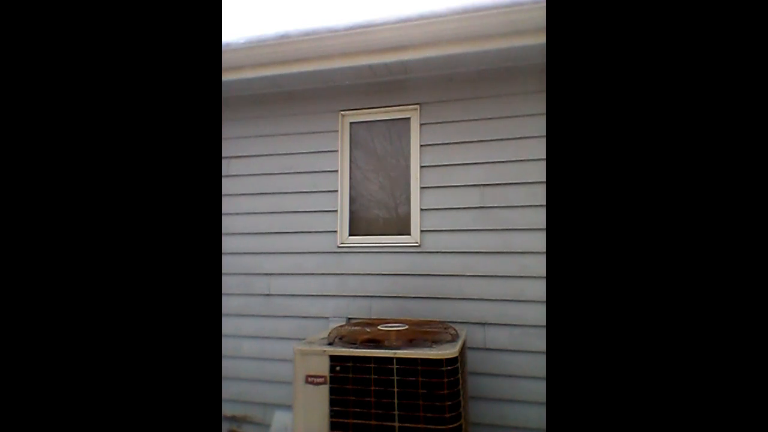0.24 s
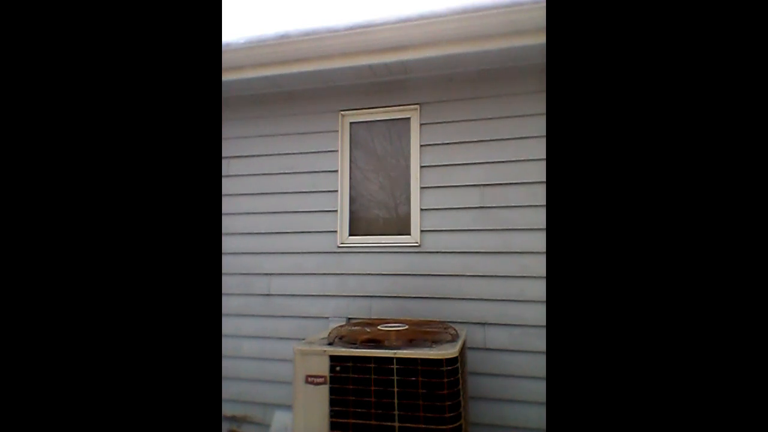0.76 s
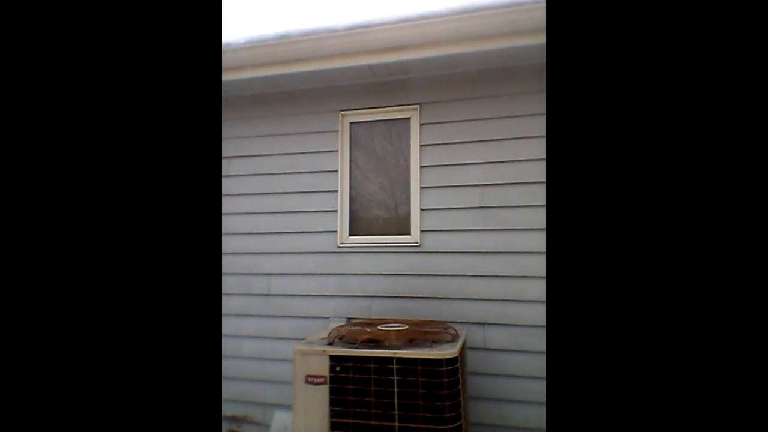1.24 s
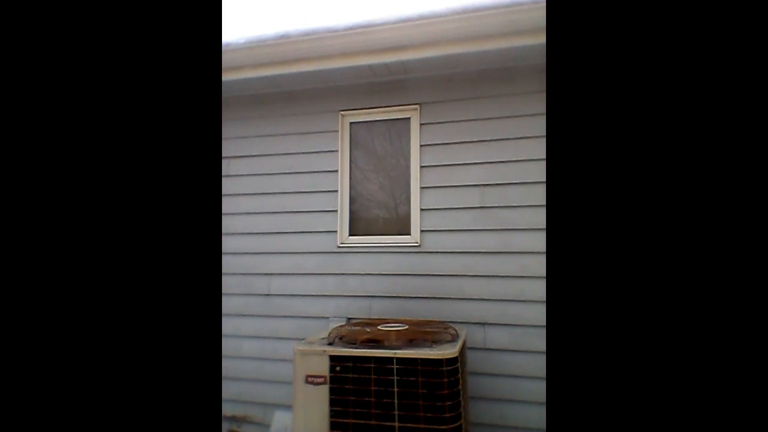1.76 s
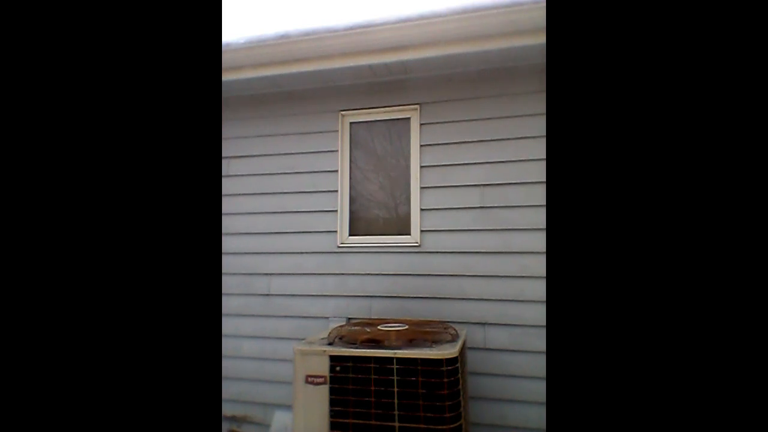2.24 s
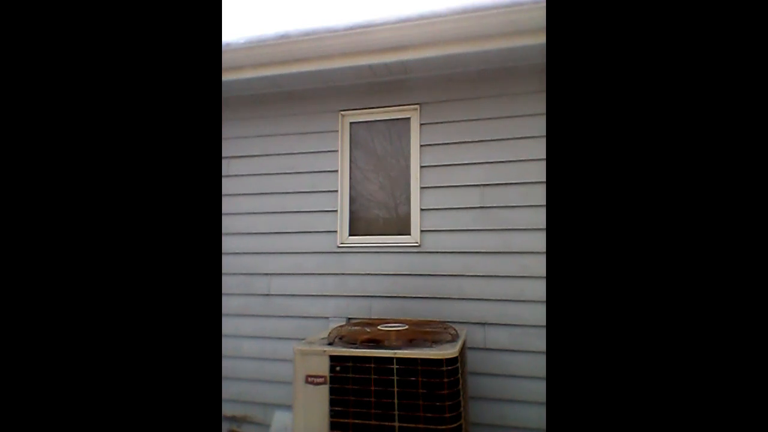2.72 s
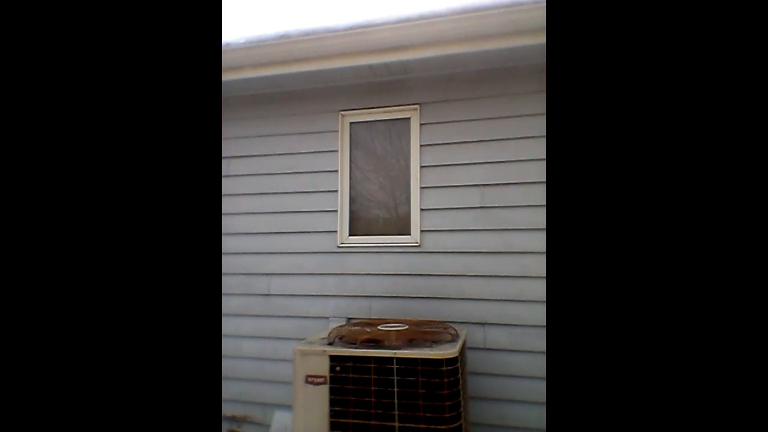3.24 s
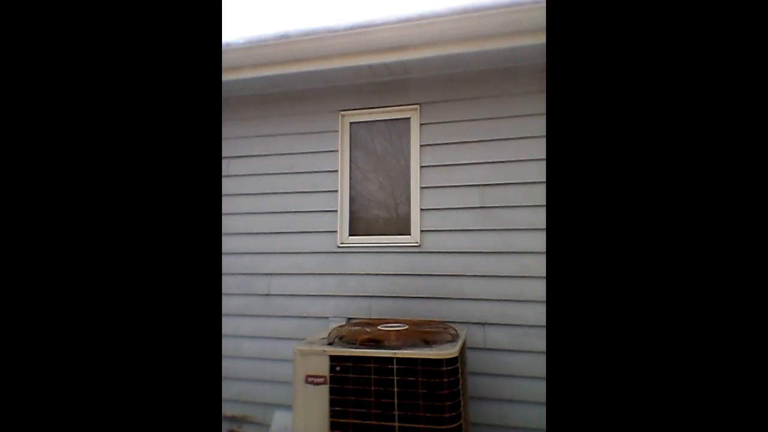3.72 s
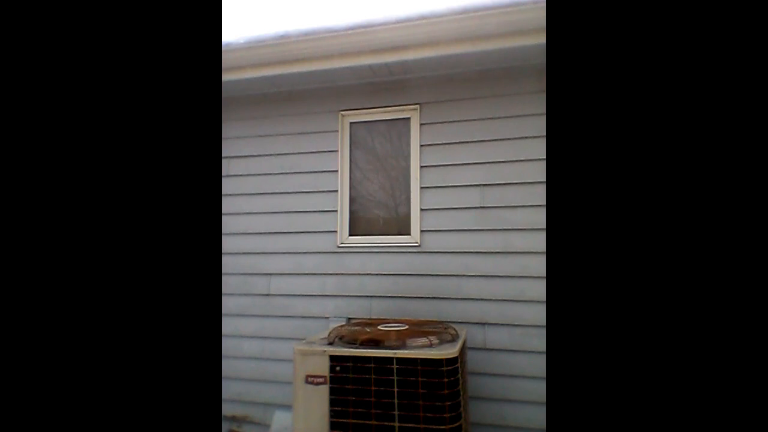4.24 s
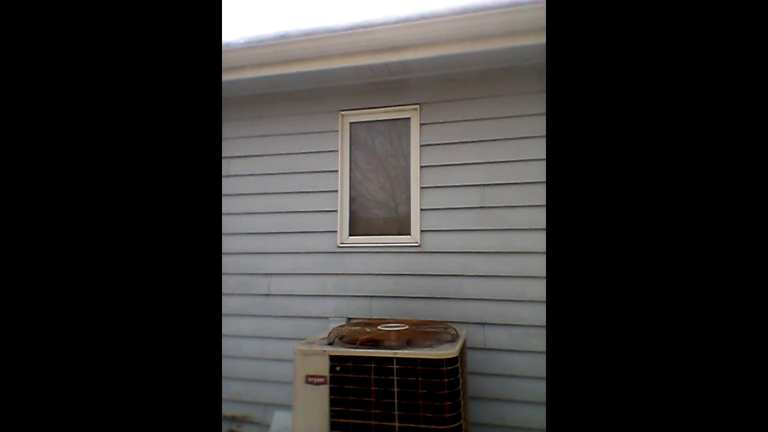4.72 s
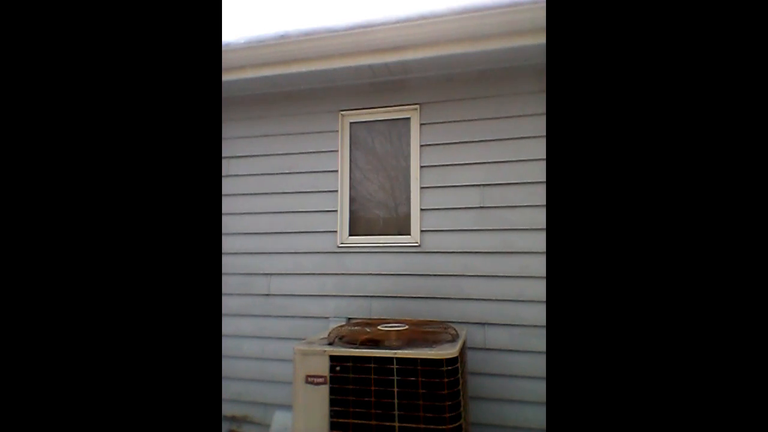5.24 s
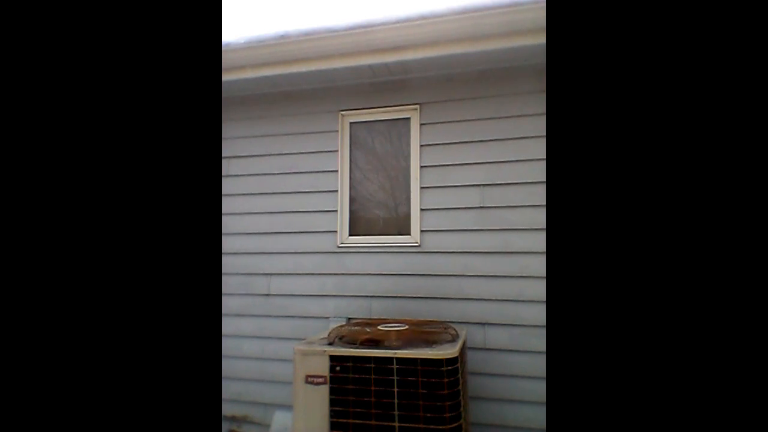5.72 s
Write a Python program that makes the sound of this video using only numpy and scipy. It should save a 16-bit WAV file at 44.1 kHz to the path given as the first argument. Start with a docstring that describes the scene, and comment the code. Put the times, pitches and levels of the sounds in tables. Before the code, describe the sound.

Faint yard rustling and birds, then a heat pump clacks on, knocks harshly for a second and settles into a hissing drone.

```python
"""A yard beside a house wall, where a heat pump starts up a few steps away.
Over faint rustling, ticks and far birds the contactor clacks, the motor iron hums and the fan spins up.
The compressor catches, then knocks hard once a turn for a second: a thud from the casing, a clank
from the steel shell and a puff of rasp. It settles to a steady drone with refrigerant hissing."""
import sys
import numpy as np
from scipy import signal
from scipy.io import wavfile
from scipy.ndimage import uniform_filter1d, minimum_filter1d

SR = 44100
rng = np.random.default_rng(int(sys.argv[2]) if len(sys.argv) > 2 else 0)


def store_wav(level_fs):
    """Save 16-bit WAV to argv[1]."""
    pcm = np.round(np.clip(np.atleast_2d(level_fs), -1, 1) * 32767)
    wavfile.write(sys.argv[1], SR, pcm.T.astype(np.int16))


N = 263277
T = np.arange(N) / SR
ONE_TURN = np.arange(4096) / 4096
SHAFT_HZ, MAINS_HZ = 59.43, 60
POWER_S, BITE_S, SURGE_END_S, EASE_S = 3.45, 4.069, 4.41, 4.778
BUILD_S, SETTLE_TAU_S = 0.12, 0.44


def gain_of(db):
    """Decibels to amplitude."""
    return 10 ** (np.asarray(db) / 20)


def unit_rms(x):
    """Scales to rms 1, a stereo pair by its mid signal."""
    return x / np.sqrt(np.mean(np.atleast_2d(x).mean(0) ** 2) + 1e-20)


def curve_at(points, hz):
    """Interpolates a table over log frequency."""
    freq_hz, value = np.transpose(points)
    return np.interp(np.log(hz + 1), np.log(freq_hz + 1), value)


def fade_in(start_s, length_s):
    """Linear ramp from 0 to 1."""
    return np.clip((T - start_s) / length_s, 0, 1)


def blow(start_s, rise_s, t60_s):
    """Impact envelope: quick rise, exponential decay."""
    return fade_in(start_s, rise_s) * gain_of(-60 * np.maximum(T - start_s, 0) / t60_s)


def held(start_s, rise_s, length_s, tau_s):
    """Envelope: rise, hold, exponential decay."""
    return fade_in(start_s, rise_s) * np.exp(-np.maximum(T - start_s - length_s, 0) / tau_s)


def drift(rate_hz):
    """Smooth random wander, rms 1."""
    knots = rng.standard_normal(2048)
    wander = np.interp(T * rate_hz, np.arange(len(knots)), knots)
    return unit_rms(uniform_filter1d(wander, int(SR / rate_hz / 2) + 1))


def stereo(a, b, hz, balance, coherence, right_lag_s=0.00017):
    """Mixes two unrelated spectra into a left-right pair; the left leads."""
    side = gain_of(curve_at(balance, hz) / 2)
    lag_rad = 2 * np.pi * hz * right_lag_s
    mid = np.sqrt(side ** 2 + side ** -2 + 2 * coherence * np.cos(lag_rad)) / 2
    common, apart = np.sqrt((1 + coherence) / 2) * a, np.sqrt((1 - coherence) / 2) * b
    return np.array([(common + apart) * side, (common - apart) / side * np.exp(-1j * lag_rad)]) / mid


# Left-right likeness of noise: freq_hz, unclipped_coherence
COHERENCE = [(100, 0.95), (1000, 0.7), (1800, 0.9), (2800, -0.07), (4500, 0.4), (7000, -0.5), (14000, -3.9)]
def noise(spectrum, balance, patchy_db):
    """Coloured stereo noise, rms 1, with patches drifting in time and frequency."""
    hz = np.fft.rfftfreq(1024, 1 / SR)
    a, b, c, d, patches = rng.standard_normal((N // 256 + 5, len(hz), 5)).transpose(2, 0, 1)
    patches = uniform_filter1d(uniform_filter1d(patches, size=8, axis=0), size=12, axis=1)
    coherence = np.clip(curve_at(COHERENCE, hz), 0, 0.995)
    frames = stereo(a + 1j * b, c + 1j * d, hz, balance, coherence)
    frames = frames * gain_of(curve_at(spectrum, hz) + patchy_db * patches / patches.std())
    return unit_rms(signal.istft(frames.transpose(0, 2, 1), nperseg=1024, noverlap=768)[1][:, :N])


# Outdoor wash spectrum: freq_hz, relative_db
WASH_SPECTRUM = [(15, -51), (25, -5.5), (65, 4.5), (145, -13.5), (179, -7), (358, -15), (506, -13),
                 (563, -15.5), (840, -11), (934, -19.5), (1010, -15), (1430, -18.5), (7450, -28),
                 (11100, -31), (14500, -36)]
# Yard stereo balance: freq_hz, left_minus_right_db
YARD_BALANCE = [(60, 2), (130, -7), (290, -1), (640, -0.5), (1410, -3.5), (3100, 2), (6820, 1.5),
                (15000, -7)]
def yard_wash(wash_db=-62, whine_hz=953, whine_db=-73):
    """Far outdoor noise with a faint wavering whine."""
    wash = gain_of(wash_db) * noise(WASH_SPECTRUM, YARD_BALANCE, patchy_db=1.5)
    whine = gain_of(whine_db) * np.sqrt(2) * np.sin(2 * np.pi * whine_hz * T + 1.2 * drift(15))
    return wash + whine


# Bouts of rustling: start_s, length_s, level_db
RUSTLE_BOUTS = [(0.046, 0.18, -58.5), (0.343, 0.37, -59.5), (0.502, .04, -54.5), (0.57, 0.25, -62),
                (0.933, 0.051, -58.5), (1.094, 0.2, -60.5), (1.367, 0.2, -63), (1.683, 0.023, -61),
                (1.794, 0.34, -66.5), (2.149, .06, -61.5), (2.27, 0.056, -57.5), (2.385, 0.19, -64.5),
                (2.739, 0.24, -57.5), (3.344, 0.29, -60)]
def rustle_envelope(floor_db=-68):
    """Bouts summed in power over a steady floor."""
    power = sum((gain_of(db) * held(start_s, 0.0043, length_s, 0.066)) ** 2
                for start_s, length_s, db in RUSTLE_BOUTS)
    return np.sqrt(gain_of(floor_db) ** 2 + power)


# Rustle spectrum: freq_hz, relative_db
RUSTLE_SPECTRUM = [(120, -31), (200, 3), (223, -5), (707, -4), (844, 1), (1120, -1), (1250, -5),
                   (1630, -6.5), (1910, -12), (3380, -8), (3690, -14), (4990, -6.5), (8210, -32),
                   (11300, -22), (14000, -38)]
def rustle():
    """Faint grainy noise in bouts."""
    grain = gain_of(1.23 * drift(70))
    return rustle_envelope() * grain * noise(RUSTLE_SPECTRUM, YARD_BALANCE, patchy_db=3.0)


# Nearby ticks: start_s, level_db
TICK_EVENTS = [(0.0895, -47), (0.1585, -53), (0.4963, -51.5), (0.515, -46.5), (0.9702, -57), (1.092, -48),
               (1.1737, -53), (1.2496, -58), (1.3653, -55.5), (1.531, -48.5), (1.6901, -47),
               (1.8093, -54.5), (2.025, -56.5), (2.2764, -55), (2.589, -55), (2.7397, -60), (2.8539, -61)]
# Tick spectrum: freq_hz, relative_db
TICK_SPECTRUM = [(350, -30), (600, -9), (917, 2), (1300, -6.5), (1680, 1.5), (2170, -15), (2920, -3),
                 (3590, -8.5), (4800, 3.5), (6300, -13.5), (11600, -30), (13000, -37)]
def ticks(patter_per_s=45, patter_tau_s=0.0066, patter_gain_db=2.5):
    """Single ticks, plus a random patter that follows the rustle."""
    taps = sum(gain_of(db) * blow(start_s, 0.00089, 0.11) for start_s, db in TICK_EVENTS)
    hits = (rng.random(N) < patter_per_s / SR) * rng.uniform(0.4, 1, N)
    patter = signal.lfilter([1], [1, -np.exp(-1 / (patter_tau_s * SR))], hits)
    envelope = taps + gain_of(patter_gain_db) * rustle_envelope() * patter
    return envelope * noise(TICK_SPECTRUM, YARD_BALANCE, patchy_db=3.0)


# Bird whistles: start_s, length_s, start_hz, end_hz, level_db
WHISTLES = [(0.055, 0.1, 1870, 3490, -58), (0.344, 0.14, 1890, 3640, -63.5),
            (1.012, 0.094, 4450, 3950, -65), (1.318, 0.021, 6400, 5550, -60.5),
            (1.634, .06, 3700, 2830, -75), (1.877, .06, 3750, 2820, -68), (2.175, 0.022, 6540, 5840, -62),
            (2.633, 0.058, 2100, 2090, -70)]
def birds():
    """Thin whistles that glide and level off, blurred by distance."""
    song = np.zeros(N)
    waver = 1 + 0.012 * drift(200)
    blur = unit_rms(0.6 + drift(320))
    for start_s, length_s, start_hz, end_hz, db in WHISTLES:
        progress = fade_in(start_s, length_s)
        pitch_hz = (start_hz + (end_hz - start_hz) * (1 - (1 - progress) ** 2.6)) * waver
        envelope = gain_of(db) * np.sqrt(2 * abs(np.sin(np.pi * progress)))
        song += envelope * np.sin(2 * np.pi * np.cumsum(pitch_hz) / SR)
    return song * blur


# Contact closure and motor jolt: start_s, level_db, t60_s
CLACK_EVENTS = [(3.4402, -21, 0.098), (3.447, -15, 0.15), (3.461, -22.5, 0.24)]
# Clack spectrum: freq_hz, relative_db
CLACK_SPECTRUM = [(59, -36), (100, -23), (250, -9), (421, -7), (560, -12), (738, -15), (988, -7.5),
                  (1400, -8.5), (1810, -10), (2180, -11.5), (2920, -14), (4250, 2), (5200, -3.5),
                  (6170, -13), (6850, -15.5), (14500, -28.5)]
# Cabinet stereo balance: freq_hz, left_minus_right_db
CABINET_BALANCE = [(60, 8), (99, 7), (160, 4.5), (270, -2), (450, 1), (740, -0.5), (1220, -3.5),
                   (2010, -4.5), (3330, 0), (5500, -1), (9080, -5), (15000, 13)]
def contactor():
    """The contacts slam shut and the sheet-metal cabinet rattles."""
    power = sum((gain_of(db) * blow(start_s, 0.003, t60_s)) ** 2 for start_s, db, t60_s in CLACK_EVENTS)
    return np.sqrt(power) * noise(CLACK_SPECTRUM, CABINET_BALANCE, patchy_db=2.5)


def strain():
    """Compressor load: 1 until EASE_S, then decaying to 0."""
    return np.exp(-np.maximum(T - EASE_S, 0) / SETTLE_TAU_S)


def surge(rise_s):
    """Envelope of the first rush of gas through the compressor."""
    return fade_in(BITE_S, rise_s) * (1 - fade_in(SURGE_END_S, 0.11))


def hum(inrush_db=-37, running_db=-48, straining_db=-49, settled_db=-43, beat_dip_s=4.31):
    """Iron hums at twice mains, loudest on run-up; twice shaft speed beats slowly against it."""
    inrush = held(3.52, 0.017, 0.55, 0.053)
    iron = gain_of(inrush_db) * inrush + gain_of(running_db) * (1 - inrush) * fade_in(POWER_S, 0.015)
    shaft = gain_of(settled_db + (straining_db - settled_db) * strain()) * fade_in(BITE_S, BUILD_S)
    rad_per_hz = 4 * np.pi * (T - beat_dip_s)
    tones = iron * np.sin(MAINS_HZ * rad_per_hz) - shaft * np.sin(SHAFT_HZ * rad_per_hz)
    judder = gain_of(1.1 * drift(30))
    return np.sqrt(2) * judder * tones


def cabinet_boom(run_up_db=-41, surge_db=-32, sag_db_per_s=29, running_db=-49):
    """Boom at three times shaft speed: brief on run-up, hard in the surge, then faint."""
    run_up = gain_of(run_up_db) * held(3.9, 0.027, 0.07, 0.021)
    surging = gain_of(surge_db - sag_db_per_s * np.maximum(T - BITE_S, 0)) * surge(rise_s=0.058)
    running = gain_of(running_db + 1.8 * drift(5.89)) * fade_in(POWER_S, 0.073)
    return np.sqrt(2) * (run_up + surging + running) * np.sin(6 * np.pi * SHAFT_HZ * T)


# Air rush spectrum: freq_hz, relative_db
RUSH_SPECTRUM = [(21, -52), (35, -33), (86, -13), (101, -3), (118, -11.5), (150, -18.5), (172, -14),
                 (205, -26), (231, -12.5), (327, -6), (357, -8), (848, -6), (2200, -29), (2860, -58),
                 (4840, -120)]
# Cabinet shudder spectrum: freq_hz, relative_db
SHUDDER_SPECTRUM = [(20, -24), (45, -6), (70, -5), (130, -7), (250, -1), (400, 1), (750, -3.5),
                    (1200, -5.5), (2200, -27), (5000, -59)]
def fan(shudder_db=-35, fade_db_per_s=15, rush_db=-36.5, spin_up_tau_s=0.43):
    """The cabinet shudders as the fan starts; the air rush grows with speed squared."""
    running_s = np.maximum(T - POWER_S, 0)
    speed = 1 - np.exp(-running_s / spin_up_tau_s)
    rush = gain_of(rush_db) * speed ** 2 * noise(RUSH_SPECTRUM, CABINET_BALANCE, patchy_db=1.5)
    shudder = gain_of(shudder_db - fade_db_per_s * running_s) * fade_in(POWER_S, 0.024)
    return rush + shudder * noise(SHUDDER_SPECTRUM, CABINET_BALANCE, patchy_db=1.0)


# Gas spits on run-up: start_s, level_db
GAS_SPITS = [(3.544, -32.5), (3.666, -37), (3.72, -38), (3.833, -40.5)]
# Starting hiss spectrum: freq_hz, relative_db
EARLY_HISS = [(1060, -14), (1800, -4.5), (2270, -7), (2740, -7.5), (3120, 1), (3370, -4), (4470, -2),
              (7290, -13.5), (10700, -28.5), (11500, -35), (12500, -50), (14000, -61)]
# Running hiss spectrum: freq_hz, relative_db
STEADY_HISS = [(1060, -17), (1800, -6.5), (2110, -13), (2830, -8.5), (3090, -11), (3680, -4.5),
               (4200, -9.5), (5090, -7.5), (5480, 1.5), (6440, -13.5), (7470, -12.5), (10700, -24.5),
               (11900, -25), (12900, -37), (14500, -38)]
def refrigerant(start_db=-39, fade_db_per_s=13, surge_db=-34, running_db=-38):
    """Gas hisses and spits in the pipes, surges at the bite and changes colour as pressure builds."""
    start = gain_of(start_db - fade_db_per_s * np.maximum(T - POWER_S, 0)) * fade_in(POWER_S, 0.031)
    spits = sum(gain_of(db) * blow(start_s, 0.002, 0.2) for start_s, db in GAS_SPITS)
    surging = gain_of(surge_db) * surge(rise_s=0.023)
    early = np.sqrt(start ** 2 + spits ** 2 + surging ** 2)
    steady = gain_of(running_db) * np.sqrt(fade_in(BITE_S, 1.0))
    return (early * noise(EARLY_HISS, CABINET_BALANCE, patchy_db=2.0)
            + steady * noise(STEADY_HISS, CABINET_BALANCE, patchy_db=1.65))


def stroke(turns, between_db, lead_turns=0.07, half_width_turns=0.22):
    """Gain over a turn: 1 on the compression stroke, between_db elsewhere."""
    offset_turns = (turns + lead_turns + 0.5) % 1 - 0.5
    push = np.exp(-(offset_turns / half_width_turns) ** 4)
    return gain_of(between_db * (1 - push))


def effort(full_db, settled_db, bite_cut_db, strain_power=1):
    """Gain of one knock layer: bites, builds to full strain, holds, settles."""
    level_db = settled_db + (full_db - settled_db) * strain() ** strain_power
    cut_db = bite_cut_db * (1 - fade_in(BITE_S, BUILD_S) ** 2)
    return gain_of(level_db - cut_db) * fade_in(BITE_S, 0.0052)


def each_turn(knock, turns):
    """Loops a stereo knock once per shaft turn, rms 1."""
    return np.array([np.interp(turns % 1, ONE_TURN, side) for side in unit_rms(knock)])


# Compressor stereo balance: freq_hz, left_minus_right_db
KNOCK_BALANCE = [(60, 1.0), (92, 0.0), (140, -0.5), (210, 1), (330, -1), (500, 1), (770, -2), (1170, 0.5),
                 (1790, -5), (2740, 0), (4190, 6.5), (6410, -7.5), (9810, -2), (15000, 14)]
def partial(order, delay_s, scatter_rad, coherence):
    """One turn of a shaft harmonic; cabinet echoes scatter its phase and smear the knock."""
    hz = order * SHAFT_HZ
    phasor = np.exp(1j * (scatter_rad * rng.standard_normal() - 2 * np.pi * hz * delay_s))
    pair = stereo(phasor, phasor * 1j * rng.choice([-1, 1]), hz, KNOCK_BALANCE, coherence)
    return (pair[:, None] * np.exp(2j * np.pi * order * ONE_TURN)).real


# Rasp spectrum: freq_hz, relative_db
RASP_SPECTRUM = [(350, -49), (600, -34), (720, -11), (823, -13), (976, 3), (1130, -11), (1340, 1.5),
                 (1630, -9), (2680, -26.5), (2950, -5.5), (3630, -16), (4310, 0.5), (6440, -15),
                 (8420, -17), (11000, -66), (14300, -79), (22000, -120)]
def stroke_rasp(turns):
    """A puff of noise on each compression stroke."""
    puffs = unit_rms(stroke(turns, between_db=-11))
    return effort(-31.5, -50.5, 1.3) * puffs * noise(RASP_SPECTRUM, KNOCK_BALANCE, patchy_db=3.5)


# Catching knocks: start_s, level_db
CATCH_EVENTS = [(3.917, -33), (3.974, -34.5), (4.006, -27.5), (4.023, -29.5), (4.055, -26), (4.073, -19.5)]
# Catching knock spectrum: freq_hz, relative_db
CATCH_SPECTRUM = [(60, -19), (200, -2.5), (600, -8.5), (1000, 4.5), (1400, -6), (1800, -16), (4400, -13.5),
                  (8000, -35), (14000, -50)]
def catching_knocks():
    """Single knocks as the compressor catches."""
    envelope = sum(gain_of(db) * blow(start_s, 0.002, 0.084) for start_s, db in CATCH_EVENTS)
    return envelope * noise(CATCH_SPECTRUM, KNOCK_BALANCE, patchy_db=2.0)


# Casing partials under strain: shaft_order, relative_db
THUD_PARTIALS = [(4, -16.5), (5, -17.5), (6, -14.5), (7, -16.5), (8, -21), (9, -11.5), (10, -17),
                 (11, -22.5), (12, -8.5), (13, -11.5), (14, -32), (15, -8), (16, -1), (17, 0.5), (18, -3),
                 (19, -13), (20, -6), (21, -3.5), (22, -8.5), (23, -2), (24, -46), (25, -13), (26, -16.5),
                 (27, -18.5), (28, -33), (29, -49), (30, -14)]
# Casing partials when settled: shaft_order, relative_db
DRONE_PARTIALS = [(4, 1.5), (5, 2), (6, -15), (7, 1.5), (8, -0.5), (9, -5), (10, -1.5), (11, -4), (12, -17),
                  (13, -2), (14, 1.5), (15, -3), (16, -13), (17, 2), (18, -7), (19, -29), (20, 1),
                  (21, 0.5), (22, -8), (23, -5), (24, -2.5), (25, -7), (26, -15), (27, -17), (28, -22),
                  (29, -24), (30, -6)]
def casing_thud(turns, lead_s=0.001322, crossfade_s=0.95):
    """A low thud every turn, evening out to a drone as the load falls."""
    thud = sum(gain_of(db) * partial(order, -lead_s, 0.49, 0.985) for order, db in THUD_PARTIALS)
    thud = thud * stroke(ONE_TURN, between_db=0.5)
    drone = sum(gain_of(db) * partial(order, -lead_s, 1.17, 0.985) for order, db in DRONE_PARTIALS)
    settled = fade_in(EASE_S, crossfade_s)
    blend = np.sqrt(1 - settled) * each_turn(thud, turns) + np.sqrt(settled) * each_turn(drone, turns)
    return effort(-23.5, -41, 6.5) * blend


# Steel shell resonances: freq_hz, width_hz, relative_db
SHELL_MODES = [(2556, 35, -10.5), (3030, 65, -9.5), (3210, 19, -23), (3320, 100, -16), (3840, 76, -5.5),
               (4270, 130, -0.5), (4284, 55, 3), (4630, 65, -5), (4750, 26, 0), (4870, 15, -6),
               (5050, 19, -4), (5350, 17, -6.5), (5520, 76, -16.5), (5780, 58, -9.5), (7320, 94, -18),
               (7300, 41, -30), (8370, 380, -24)]
def shell_clank(turns, lead_s=0.000397, dispersion_s_per_hz=5e-7, floor_db=-26, surge_db=6):
    """A bright clank every turn: high shaft harmonics lifted by the shell's resonances."""
    orders = np.arange(31, 165)
    freqs_hz = orders * SHAFT_HZ
    peaks = np.max([gain_of(db) / np.hypot(1, 2 * (freqs_hz - mode_hz) / width_hz)
                    for mode_hz, width_hz, db in SHELL_MODES], axis=0)
    floor = gain_of(floor_db) / np.hypot(1, (freqs_hz / 6500) ** 4)
    rattle, chatter, clank = np.zeros((3, 2, len(ONE_TURN)))
    for order, hz, gain in zip(orders, freqs_hz, np.hypot(peaks, floor)):
        band = rattle if hz < 2850 else chatter if hz < 3700 else clank
        delay_s = dispersion_s_per_hz * (hz - 4400) ** 2 / hz - lead_s  # bending waves disperse
        band += gain * partial(order, delay_s, scatter_rad=0.7, coherence=0.4)
    struck = stroke(ONE_TURN, between_db=-5.5)
    surge_lift = gain_of(surge_db * surge(rise_s=0.13))
    return (effort(-38, -58.5, 5.6, strain_power=0.7) * each_turn(rattle * struck, turns)
            + effort(-38, -57.5, 4.8, strain_power=0.51) * surge_lift * each_turn(chatter * struck, turns)
            + effort(-22, -50.5, 6) * each_turn(clank * struck, turns))


def compressor(phase_zero_s=4.4619, run_up_turns=0.0526, run_up_tau_s=0.067):
    """A few single knocks, then rasp, thud and clank once per turn of a slightly uneven shaft."""
    run_up = run_up_turns * np.exp(-np.maximum(T - BITE_S, 0) / run_up_tau_s)
    jitter_turns = 0.00088 * drift(8.4) + 0.0005 * drift(55)
    turns = SHAFT_HZ * (T - phase_zero_s) + run_up + jitter_turns
    rasp = stroke_rasp(turns)
    catches = catching_knocks()
    knocking = rasp + casing_thud(turns) + shell_clank(turns)
    return catches + knocking * gain_of(0.17 * drift(50))


def scene():
    """The yard and the heat pump."""
    yard = yard_wash() + rustle() + ticks() + birds()
    return yard + contactor() + hum() + cabinet_boom() + fan() + refrigerant() + compressor()


def record(dry, low_cut_hz=42, ceiling=0.7, high_cut_hz=14600):
    """Low cut, fast peak limiter, band limit."""
    thinned = signal.sosfilt(signal.butter(4, low_cut_hz, "highpass", fs=SR, output="sos"), dry)
    allowed_gain = ceiling / np.maximum(abs(thinned).max(0), ceiling)
    limited = thinned * uniform_filter1d(minimum_filter1d(allowed_gain, size=121), size=121)
    lowpass = signal.firwin(511, high_cut_hz, window=("kaiser", 9), fs=SR)
    return signal.oaconvolve(limited, lowpass[None], "same")


dry = scene()
out = record(dry)
store_wav(out)
```